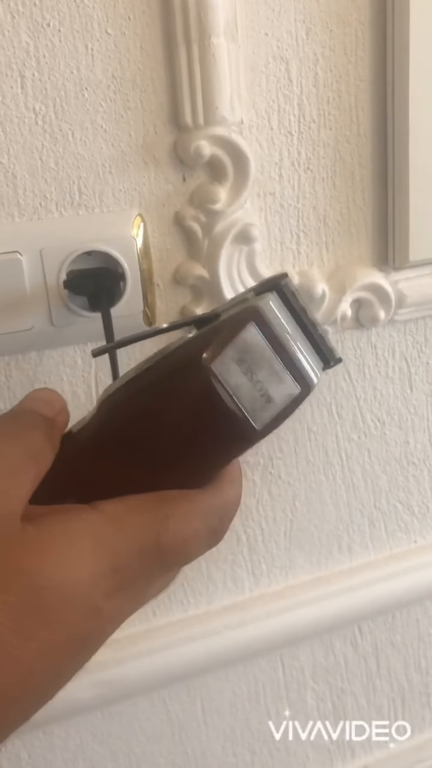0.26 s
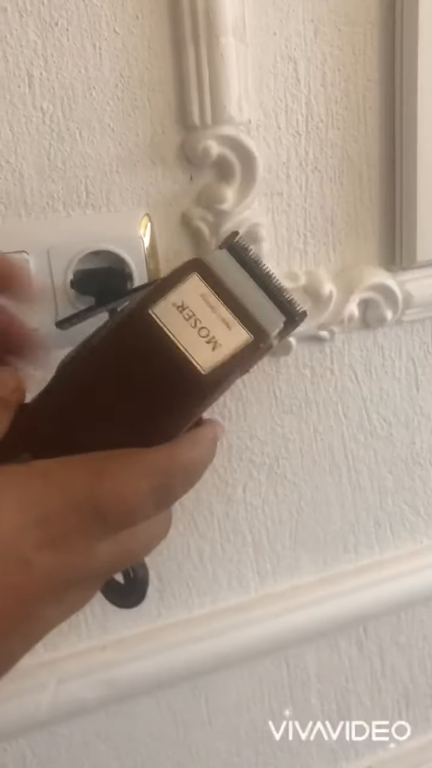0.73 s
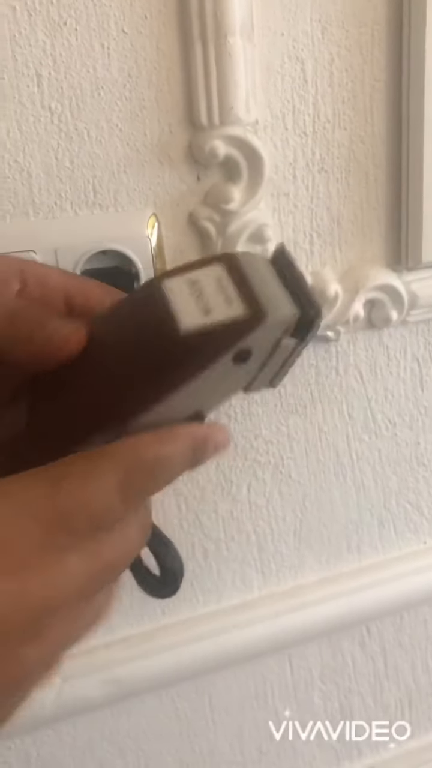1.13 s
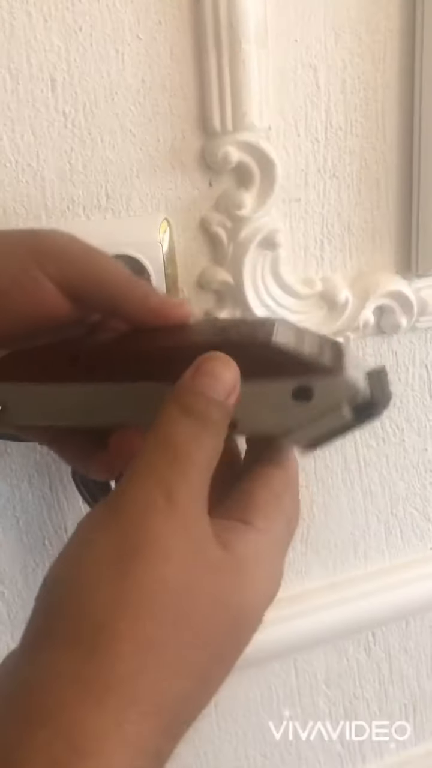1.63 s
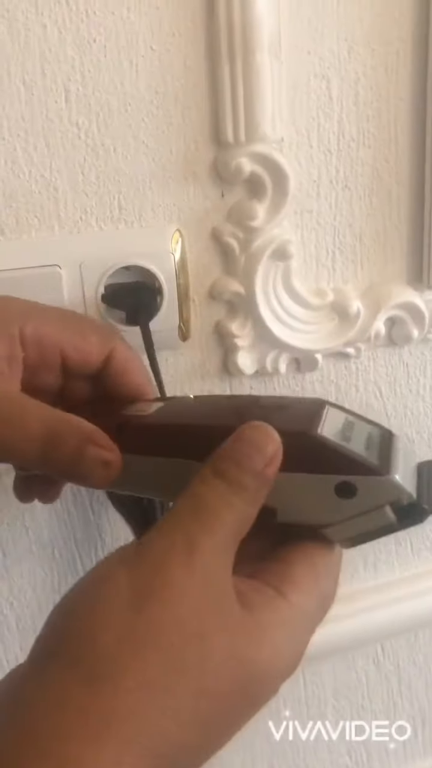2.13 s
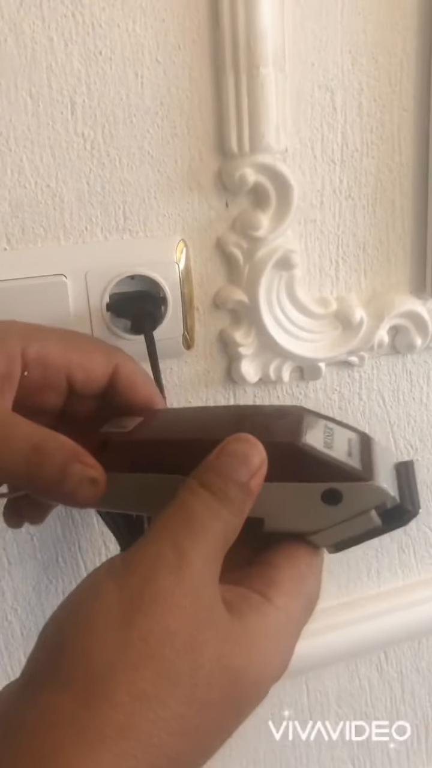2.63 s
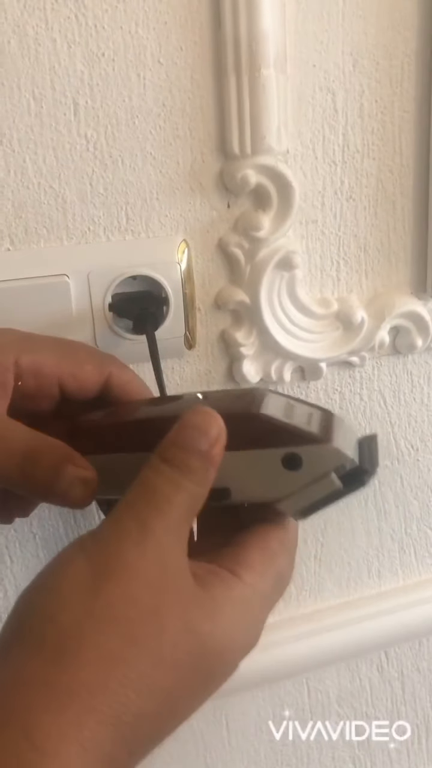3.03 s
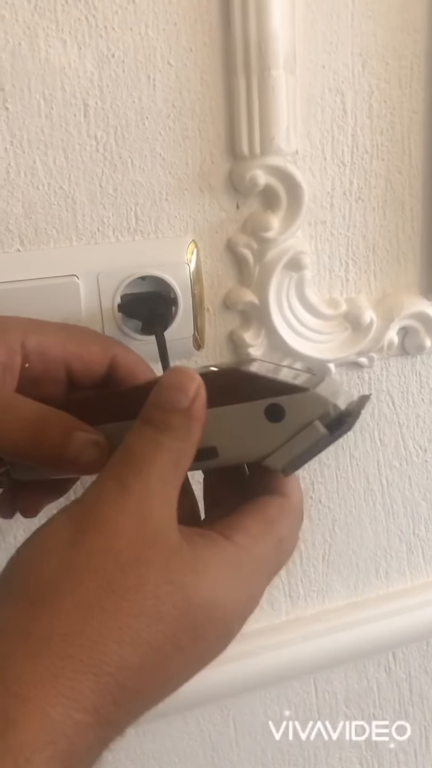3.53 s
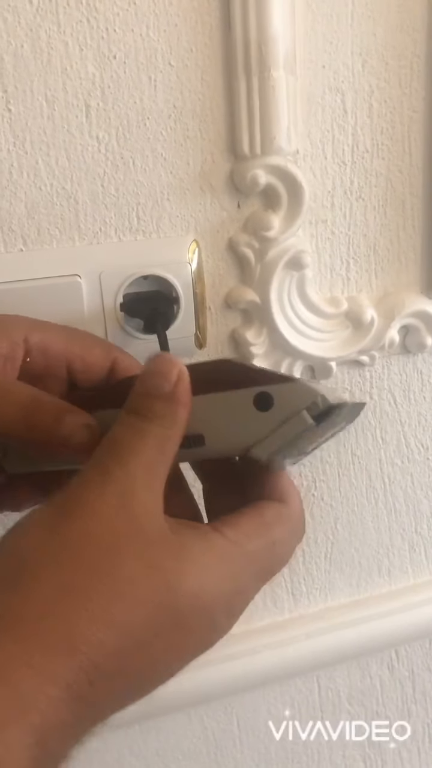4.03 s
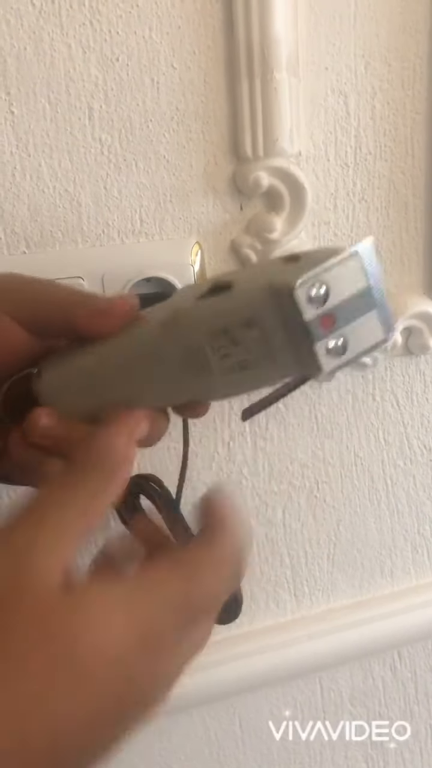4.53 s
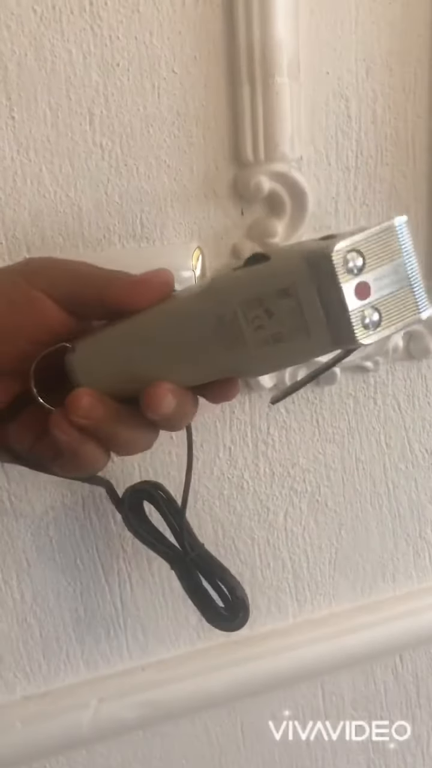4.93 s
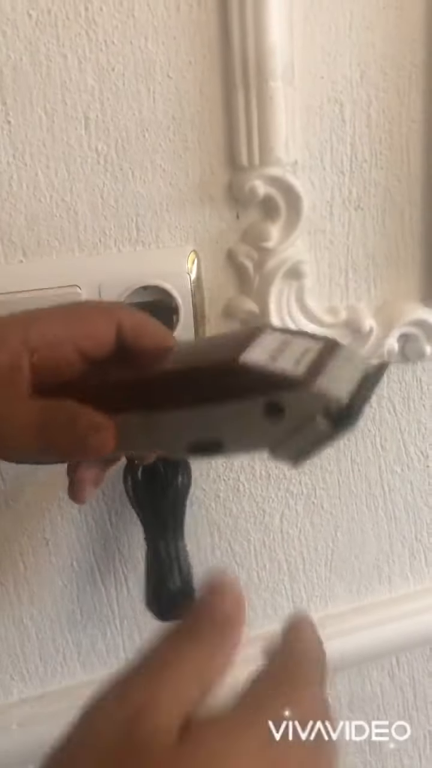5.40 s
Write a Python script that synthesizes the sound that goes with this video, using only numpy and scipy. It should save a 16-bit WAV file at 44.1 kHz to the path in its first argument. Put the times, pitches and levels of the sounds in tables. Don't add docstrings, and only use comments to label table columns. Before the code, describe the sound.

For the first 2.3 seconds a small hard-walled room is almost silent: soft air, a faint unsteady low drone from a distant machine, and tiny finger touches on plastic. Slight ticks come at about 0.7 to 1.0 seconds, a duller double knock at 1.6 to 1.8, and barely audible skin rubs around 2.0. At 2.3 a slide switch snaps over in three sharp clicks within about 35 milliseconds, far louder than anything else, with a brief bright room echo. The mains hair clipper starts immediately, close to the phone: a steady 100-hertz hum and buzz, rattling case and fizzing steel blades. The tone holds fairly steady until about 4, then shifts as the clipper is turned, thinner in hum and differently metallic around 4.5 to 5, with a crisp tick at 5.0. It becomes fuller and rougher after 5.2, with a finger knock near 5.57, still running at the end.

```python
import sys
import numpy as np
from scipy import signal
from scipy.fft import rfft, irfft, next_fast_len
from scipy.io import wavfile
from scipy.ndimage import uniform_filter1d, map_coordinates

SR = 44100
rng = np.random.default_rng(int(sys.argv[2]) if len(sys.argv) > 2 else 0)


def unload_audio(sound):
    columns = np.transpose(np.atleast_2d(sound))
    steps = np.round(np.clip(columns, -1, 1) * 32767)
    wavfile.write(sys.argv[1], SR, steps.astype(np.int16))


def level_to_linear(level):
    exponent = np.asarray(level, float) / 20
    return 10 ** exponent


N = 249606


def clipper():
    # (time [s], roll [faces: 0 side, 1 blade plate, 2 back, 3 other side], grip [0-1],
    # nearness [dB])
    hand = [(2.5, 0, .72, -.3), (2.7, 0, .68, .3), (2.84, 0, .75, .5), (2.96, 0, .22, -.6),
            (3.5, .03, .2, -.6), (3.95, .2, .17, .3), (4.12, .45, .15, .6), (4.32, .55, .05, .7),
            (4.48, .88, 0, -.3), (4.77, 1, .3, -.9), (5.0, 1.08, .14, 0), (5.15, 1.62, .04, 1),
            (5.3, 1.7, 0, .8), (5.42, 1.95, .1, -.3), (5.54, 2.1, .2, -.5), (5.58, 2.5, .6, .8),
            (5.66, 2.55, .75, 1.5)]
    # (rattle [dB], sizzle [dB], loose case [dB],
    # hollow ring [dB], strength of the back stroke [0-1])
    faces = [(-57.5, -52.5, -57, -69.5, 0.99), (-57, -54, -54, -64.5, 0.35), (-55, -54.5, -55.5, -59, 0.92),
             (2, -1.5, 1, 14, -.3)]
    roll, grip, near_db = curves(hand)
    side, plate, rear, other = blend(roll, count=4)
    share = np.array([side + other, plate, rear, grip])
    rattle_db, sizzle_db, loose_db, hollow_db, back = np.transpose(faces) @ share
    stroke_hz, first_stroke_s = 99.99, 2.3425
    cycle = stroke_hz * (np.arange(N) / SR - first_stroke_s)

    late = .0025 * wobble(60)
    stops = np.diff(np.floor(cycle + late), prepend=0).clip(0, 1)
    blows = 75 * np.clip(.8 - back, 0, 1) * stops
    sound = np.sqrt(2) * (magnet_hum(cycle, share) + case_buzz(cycle, share, roll))
    sound += loose_case(loose_db, hollow_db)
    sound += level_to_linear(rattle_db) * blade_rattle(cycle, roll, back, blows)
    sound += level_to_linear(sizzle_db) * blade_sizzle(cycle, roll, grip * side, back, blows)
    start_up = np.clip((cycle + 1.7) / 0.98, 0, 1)
    return start_up * level_to_linear(near_db) * sound


# (level from side [dB], from blade plate [dB], from back [dB], change under a full grip [dB])
CASE_ORDERS = [(-44, -54.5, -48.5, -3), (-61, -73, -61.5, 0), (-71, -68.5, -67.5, 10.5),
               (-55.5, -53, -61.5, -9), (-53, -64, -58, 0), (-55.5, -56, -59, 5.5),
               (-50.5, -59.5, -48, -9.5), (-52.5, -66, -62, -7.5), (-74, -57, -55, -3),
               (-75, -73, -56, 11.5), (-68, -78, -68, 3), (-65.5, -75, -63.5, 2.5), (-55.5, -77.5, -64, -7),
               (-66.5, -60.5, -62.5, 14), (-59.5, -58.5, -53, -3.5), (-74.5, -63.5, -53.5, 20.5),
               (-71, -66, -67, 10), (-70.5, -70, -79, 10.5), (-64, -74, -68, -9.5), (-62.5, -74.5, -64, 3),
               (-82, -63, -76, 5), (-63.5, -75, -74, 3), (-62, -97, -80, -14), (-69, -63, -96, -14),
               (-91, -86, -60.5, -14), (-69, -104, -74, -4)]


def magnet_hum(cycle, share):
    plate = share[1]
    aim = share * [1 + plate, plate, 1 + plate, np.ones(N)]
    return -level_to_linear(CASE_ORDERS[0] @ aim) * np.cos(2 * np.pi * (cycle + .15))


def case_buzz(cycle, share, roll):
    buzz = np.zeros(N)
    for k, face_db in enumerate(CASE_ORDERS[1:], 2):
        spread = rng.normal(0, .4 * (k / 12) ** 3)
        turning = rng.normal(0, .05) * (2 * roll - share[3])
        slip = spread + .005 * k * wobble(12) + turning
        level = level_to_linear(face_db @ share + 0.018 * k * wobble(7.7))
        buzz -= level * np.cos(2 * np.pi * (k * cycle + slip))
    return buzz


def loose_case(loose_db, hollow_db):
    # (frequency [Hz], density [dB per Hz])
    whirr_colour = [(150, -42), (300, -28), (800, -8), (1150, -13), (1600, -12), (2400, -9.5),
                    (3500, -13.5)]
    whirr = level_to_linear(loose_db + wobble(10)) * coloured(rng.standard_normal(N), whirr_colour)
    hollow = peak(1593, width_hz=540)
    ring = unit(filtered(rng.standard_normal(N), lambda f: hollow(f) ** 2))
    return whirr + level_to_linear(hollow_db + wobble(10)) * ring


def blade_rattle(cycle, roll, back, blows):
    # (frequency [Hz], density [dB per Hz])
    rattle_colours = [
        [(1410, -23), (2400, 2), (3600, -0.5), (4200, -3.5), (4700, -6), (5200, -2), (5850, -13), (7000, -31),
         (9100, -37), (15400, -120)],
        [(1410, -26), (2400, -20), (2710, 7), (2940, 0), (3310, 1), (4180, -6), (5260, -2.5), (7000, -17),
         (9100, -23), (15400, -120)],
        [(1410, -34), (2400, -4), (3900, -0.5), (4330, 4.5), (4700, -4), (5050, 9.5), (5450, 5.5), (5950, -14),
         (9100, -42.5), (15400, -120)],
        [(1410, -31), (2400, -3.5), (3130, -2), (3400, -3), (4000, -19), (4660, -5.5), (6290, -18), (7000, -21),
         (9100, -39), (15400, -120)],
        [(1410, -40), (2500, -11), (3300, 5.5), (3690, -3), (4350, -13), (5120, 5.5), (5670, -7), (7000, -29),
         (9100, -38.5), (15400, -120)],
        [(1410, -38), (2400, -9), (3020, 0), (3510, 3), (4220, -11), (5000, -5), (6010, -22.5), (7000, -29),
         (9100, -46), (15400, -120)],
    ]
    rattle_poses = [(0, 0), (.45, 1), (.55, 1), (.85, 2), (1.1, 2), (1.62, 3), (1.82, 4), (2.15, 4),
                    (2.5, 5)]
    weight = blend(np.interp(roll, *np.transpose(rattle_poses)), count=6)
    knocks = strokes(cycle, back, lag=0, sharp=4, rest=.8 * back, scatter_db=1)
    return blade(cycle, weight, rattle_colours, repeat=1.2, drift=.9, gate=knocks, blows=blows, patchy_db=.8)


def blade_sizzle(cycle, roll, full_hand, back, blows):
    # (frequency [Hz], density [dB per Hz])
    sizzle_colours = [
        [(3820, -23), (6500, -11), (7620, -15), (9130, -9), (10000, -10), (11400, -1), (13800, -23),
         (15100, -24), (15700, -31)],
        [(3820, -46), (6500, -13), (8480, -0.5), (9230, -2), (10400, 0.5), (12100, -8), (13100, -10),
         (15100, -31), (15700, -24)],
        [(3820, -10), (6500, -9), (7050, -8), (7650, -4.5), (10700, -2.5), (11700, 0.5), (12300, 4),
         (13600, -22), (15700, -32)],
        [(3820, -19), (6500, -13), (7700, -1), (8890, -8), (9610, -1.5), (11100, -9), (12000, -3), (13600, -24),
         (15700, -35)],
        [(3820, -26), (6500, -0.5), (6790, -14), (7290, 1), (9720, 3.5), (12200, 3), (13600, -13),
         (15100, -15.5), (15700, -10)],
    ]
    sizzle_poses = [(0, 1), (.2, 1.2), (.45, 2), (.55, 2), (.85, 3), (1.1, 3), (1.6, 4)]
    weight = blend(np.interp(roll, *np.transpose(sizzle_poses)) - 1.3 * full_hand, count=5)
    scrapes = strokes(cycle, .8 * back, lag=-.08, sharp=7, rest=.33, scatter_db=1.5)
    return blade(cycle, weight, sizzle_colours, repeat=0.13, drift=0.33, gate=scrapes,
                 blows=blows / 15, patchy_db=0.9)


def strokes(cycle, back, lag, sharp, rest, scatter_db):
    size = level_to_linear(scatter_db * rng.standard_normal((2, N * 101 // SR + 2)))

    def swell(at):
        return np.exp(sharp * (np.cos(2 * np.pi * (cycle - at)) - 1))

    def index(at):
        return np.clip(np.floor(cycle - at + .5).astype(int), 0, None)

    forth = size[0, index(lag)] * swell(lag)
    return rest + forth + back * size[1, index(lag + .43)] * swell(lag + 0.39)


def blade(cycle, weight, colours, repeat, drift, gate, blows, patchy_db):
    stroke = np.clip(cycle + .5, 0, None).astype(int)
    place = ((cycle + .5) % 1 * 441).astype(int)
    same = rng.standard_normal((len(colours), 442))[:, place]
    fresh = rng.standard_normal((stroke[-1] + 1, 442))
    slow = unit(uniform_filter1d(fresh, size=14, axis=0))[stroke, place]
    loose = drift * slow + rng.standard_normal(N)
    sound = np.zeros(N)
    for w, s, colour in zip(weight, same, colours):
        sound += w * coloured((repeat * s + loose) * gate + blows, colour)
    return patchy(sound, patchy_db)


def patchy(x, patchy_db):
    z = signal.stft(x, nperseg=512)[2]
    field = uniform_filter1d(rng.standard_normal(z.shape), size=3, axis=0)
    field = unit(uniform_filter1d(field, size=50, axis=1))
    return unit(signal.istft(z * level_to_linear(patchy_db * field), nperseg=512)[1][:N])


def switch():
    # (time [s], rms at the loudest [dB], t60 of the crack [s])
    snaps = [
        (2.3008, -10.5, .010),
        (2.3143, -10.7, .010),
        (2.3356, -10.5, .009),
    ]
    # (frequency [Hz], density [dB per Hz])
    snap_colours = [
        [(180, -61), (300, -35), (2070, -8.5), (2850, -4.5), (3740, 3), (4810, -13), (6290, -1.5),
         (8370, -10.5), (13600, -10.5), (15300, -15.5), (16700, -59)],
        [(180, -51), (300, -39), (809, -6.5), (2410, -7.5), (2950, 0.5), (4130, -10), (6190, -9), (6620, -15),
         (11300, -6.5), (14600, -15), (16700, -60)],
        [(180, -48), (300, -18), (1640, -8.5), (2110, -1), (4730, -9), (5320, -2), (6960, -20), (8950, -3.5),
         (9900, -12), (15300, -19), (16700, -45)],
    ]
    # (delay [s], level [dB])
    walls = [(.0025, -15), (.0065, -17)]
    hold_s, rise_s, echo_db = .0012, 0.00037, -8
    x, t = np.zeros(N), np.arange(SR // 2) / SR
    for (s, db, t60), colour in zip(snaps, snap_colours):
        fall = level_to_linear(-60 * np.clip(t - hold_s, 0, None) / t60)
        crack = rng.standard_normal(len(t)) * fall * (1 - np.exp(-t / rise_s))
        crack = np.roll(evened(crack, size=350), 88)
        snap = coloured(crack, colour) * np.clip(t / .0003 - 6, 0, 1)
        near = sum(level_to_linear(g) * np.roll(filtered(snap, peak(3000, 4170)), round(d * SR)) for d, g in walls)
        loudest = uniform_filter1d(snap ** 2, size=110).max()
        crest_db = 10 * np.log10(np.max((snap + near) ** 2) / loudest)
        x = add_at(x, s - .002, db + crest_db, snap + near)
        x = add_at(x, s, db + echo_db, room())
    return x


def room():
    # (frequency [Hz], density [dB per Hz])
    echo_colour = [(180, -41.5), (300, -10), (582, -5.5), (722, -6), (852, 2), (1680, -7.5), (3000, -2.5),
                   (4310, -8.5), (6210, -7.5), (11300, -13.5), (15700, -30)]
    # (frequency [Hz], t60 [s])
    decay = [(200, 0.47), (1000, 0.28), (3000, 0.46), (8000, 0.29), (15000, 0.45)]
    hz, t, z = signal.stft(coloured(rng.standard_normal(SR // 2), echo_colour), SR, nperseg=256)
    tail = signal.istft(z * level_to_linear(-60 * t / along(decay, hz)[:, None]), SR, nperseg=256)[1]
    t = np.arange(len(tail)) / SR
    far_wall = level_to_linear(5 * np.exp(-((t - .0165) / .0035) ** 2))
    return tail * np.clip(t / 0.01, 0, 1) * far_wall


def fingers():
    # (time [s], peak [dB], frequency [Hz], width [Hz], t60 [s])
    ticks = [(.004, -61.5, 5000, 5000, 0.36), (0.719, -61, 5330, 2200, 0.022),
             (.84, -59, 6000, 9000, 0.018), (1.022, -67, 3200, 300, .03), (1.612, -51, 3300, 1300, 0.012),
             (1.611, -58, 1580, 300, 0.034), (1.761, -49, 786, 696, 0.092), (1.768, -47, 420, 80, 0.049),
             (1.79, -48, 220, 50, 0.15), (1.797, -62, 3200, 2000, .02), (2.278, -48, 5000, 8000, 0.016),
             (2.855, -43, 513.4, 700, 0.087), (5.565, -43, 3000, 2000, 0.068), (3.799, -51.5, 60, 40, .3),
             (4.9963, -30.5, 3700, 4500, 0.0087), (4.9965, -44, 2590, 600, .025)]
    # (start [s], length [s], level [dB], frequency [Hz], width [Hz])
    rubs = [
        (2.29, .0063, -56, 3100, 8000),
        (2.292, .0093, -66, 3100, 4400),
        (.49, .045, -74.5, 5100, 9000),
        (1.22, .06, -80, 8000, 6000),
        (1.1, .26, -79, 4000, 6400),
        (1.99, .19, -80.5, 9300, 1300),
        (2.0, .2, -88, 6600, 220),
        (2.06, .11, -86, 12000, 1500),
    ]
    x, t = np.zeros(N), np.arange(SR // 2) / SR

    def skin_hiss(hz, width_hz):
        noise = filtered(rng.standard_normal(len(t)), peak(hz, width_hz))
        return unit(filtered(noise, peak(hz, 2 * width_hz)))

    for s, db, hz, width_hz, t60 in ticks:
        ring = np.sqrt(SR / width_hz / 40) * np.sin(2 * np.pi * hz * t)
        envelope = level_to_linear(-60 * t / t60) * (1 - np.exp(-t / (0.016 * t60)))
        x = add_at(x, s, db, (ring + skin_hiss(hz, width_hz)) * envelope)
    for s, length, db, hz, width_hz in rubs:
        stroke = np.sin(np.pi * np.clip(t / length, 0, 1))
        x = add_at(x, s, db + 13.5, skin_hiss(hz, width_hz) * stroke)
    return x


def background():
    # (frequency [Hz], density [dB per Hz])
    air_colour = [(15, -60), (25, -14.5), (92, -9), (145, -12.5), (170, -1.5), (223, -11), (285, -5),
                  (405, -8.5), (607, -14.5), (677, -17.5), (818, -14), (2550, -30.5), (11300, -38),
                  (14800, -42.5), (16000, -68)]
    # (frequency [Hz], width [Hz], level [dB])
    drone = [(140.5, 4, -66.5), (157, 6.4, -65), (282.3, 6, -65.5), (619, 3.58, -78)]
    t = np.arange(N) / SR
    sound = level_to_linear(-60.5 + wobble(5.5) / 2) * coloured(rng.standard_normal(N), air_colour)
    for hz, width_hz, db in drone:
        swell = level_to_linear(2.4 * wobble(width_hz))
        sound += level_to_linear(db + 2) * swell * np.sin(2 * np.pi * hz * t + wobble(width_hz))
    return sound


def unit(x):
    return x / np.sqrt(np.mean(x ** 2) + 1e-20)


def along(points, hz):
    f, v = np.transpose(points)
    return np.interp(np.log(hz + 1), np.log(f + 1), v)


def curves(rows):
    s, *cols = np.transpose(rows)
    return [np.interp(np.arange(N) / SR, s, c) for c in cols]


def wobble(rate):
    at = np.linspace(0, N, num=2000)
    knots = rng.standard_normal(int(N * rate / SR) + 4)
    return np.interp(np.arange(N), at, map_coordinates(knots, [at * rate / SR]))


def filtered(x, response):
    m = next_fast_len(len(x) + 8192)
    return irfft(rfft(x, m) * response(np.fft.rfftfreq(m, 1 / SR)), m)[:len(x)]


def coloured(x, spectrum):
    return unit(filtered(x, lambda f: level_to_linear(along(spectrum, f))))


def peak(hz, width_hz):
    return lambda f: 1j * f * width_hz / (hz * hz - f * f + 1j * f * width_hz)


def evened(x, size):
    z = rfft(x)
    return irfft(z / np.sqrt(uniform_filter1d(abs(z) ** 2, size)), len(x))


def blend(pose, count):
    pose = np.clip(pose, 0, count - 1)
    return [np.clip(1 - abs(pose - k), 0, 1) for k in range(count)]


def add_at(x, s, db, wave):
    start = round(s * SR)
    return x + np.pad(level_to_linear(db) * wave / abs(wave).max(), (start, N))[:N]


def scene():
    return (clipper() + switch() + fingers() + background())[None]


def top_cut(x):
    return signal.sosfilt(signal.butter(12, 16830, fs=SR, output="sos"), x)


def record(dry):
    def below(top_hz):
        return filtered(dry[0], lambda f: np.sin(np.pi / 2 * np.clip((top_hz - f) / 120, 0, 1)) ** 2)

    low = below(15800)
    top = below(16880) - low
    attack = uniform_filter1d(abs(top), size=200) > level_to_linear(-60)
    mix = low + uniform_filter1d(1. * attack, size=100) * top
    return top_cut(mix[None])


dry = scene()
out = record(dry)
unload_audio(out)
```